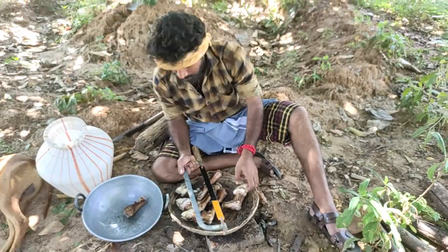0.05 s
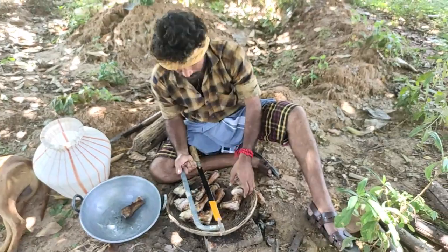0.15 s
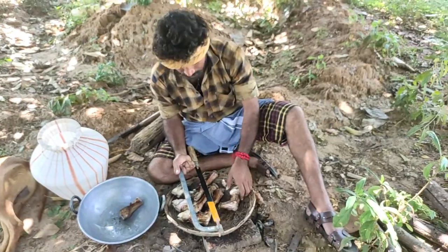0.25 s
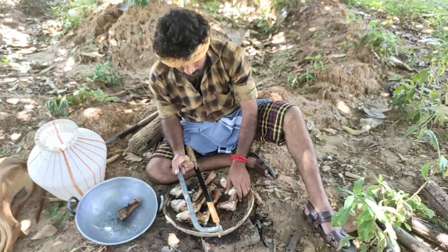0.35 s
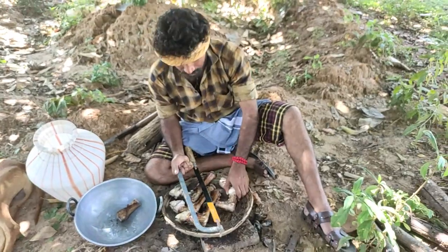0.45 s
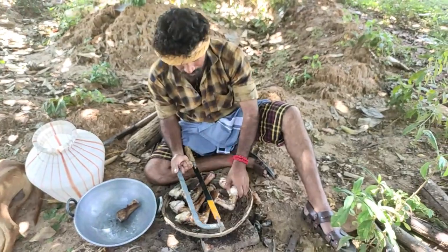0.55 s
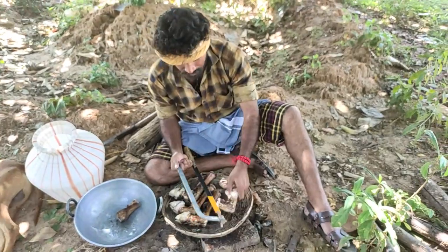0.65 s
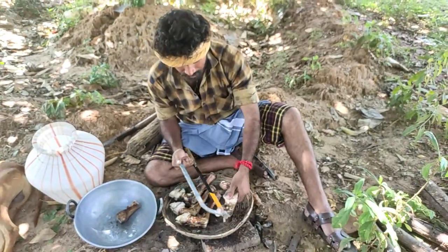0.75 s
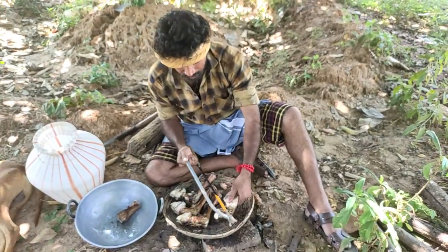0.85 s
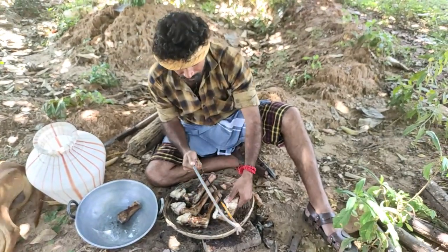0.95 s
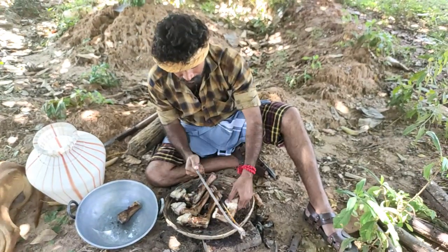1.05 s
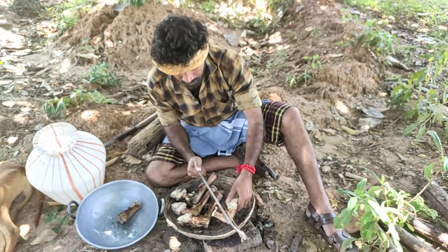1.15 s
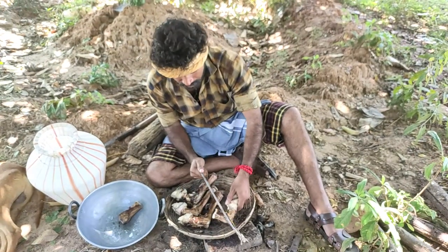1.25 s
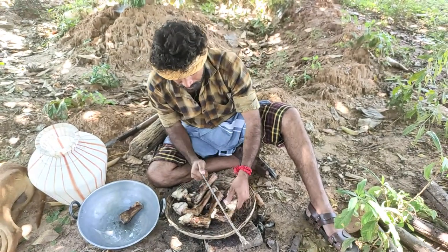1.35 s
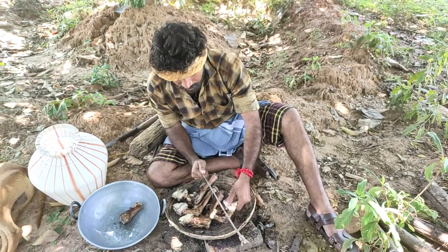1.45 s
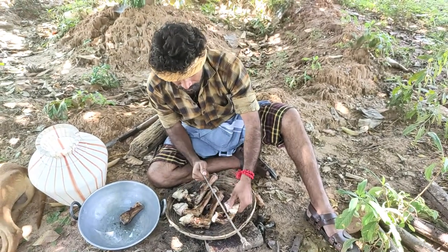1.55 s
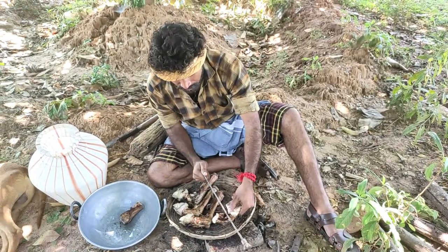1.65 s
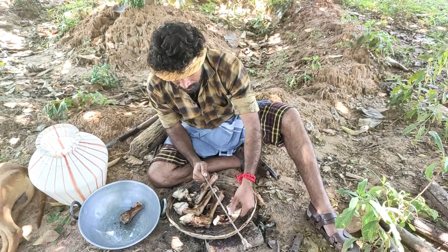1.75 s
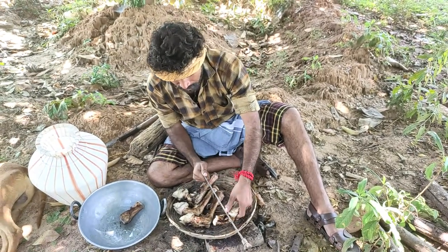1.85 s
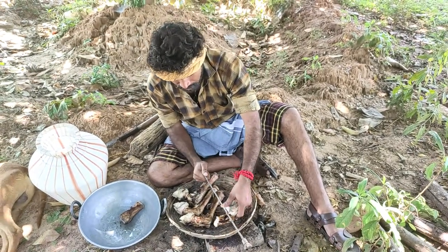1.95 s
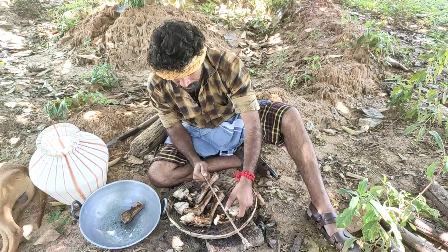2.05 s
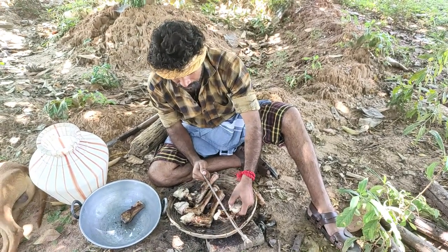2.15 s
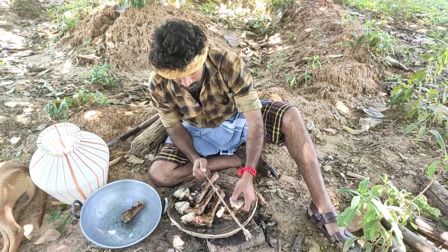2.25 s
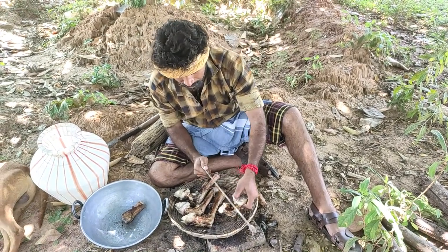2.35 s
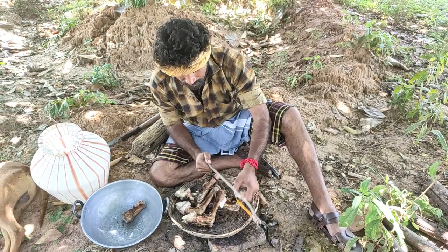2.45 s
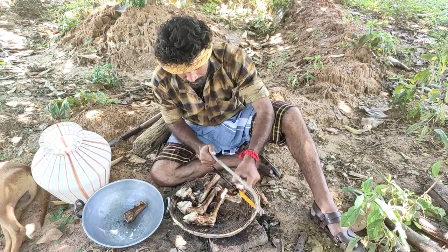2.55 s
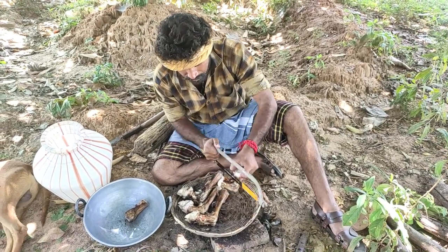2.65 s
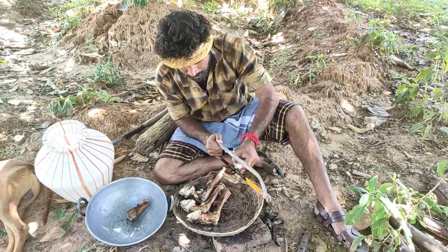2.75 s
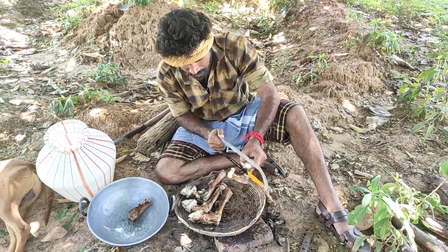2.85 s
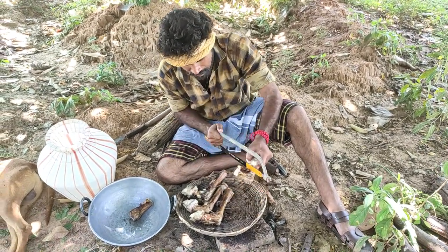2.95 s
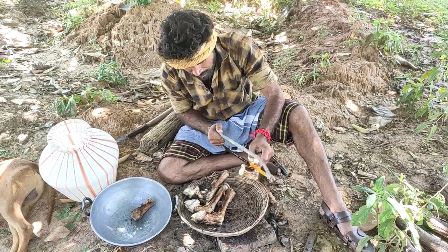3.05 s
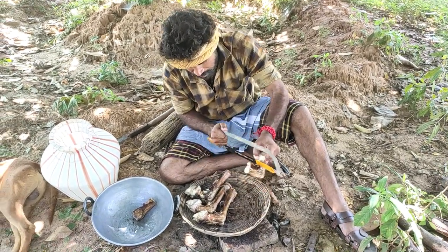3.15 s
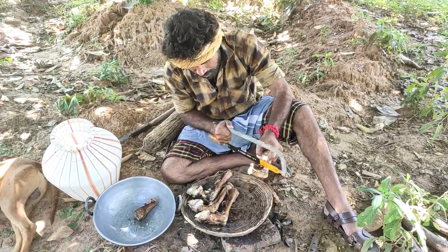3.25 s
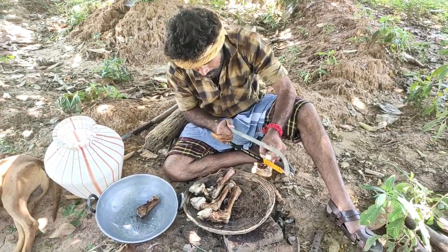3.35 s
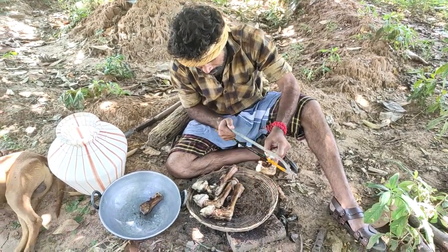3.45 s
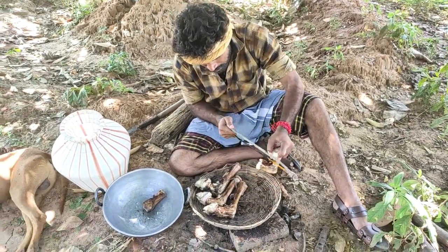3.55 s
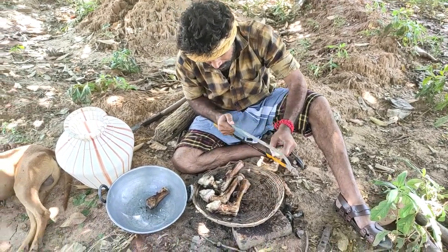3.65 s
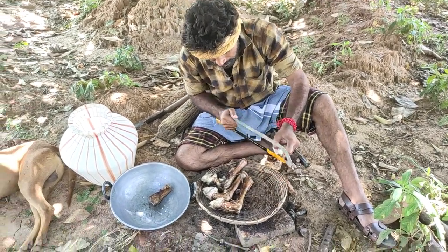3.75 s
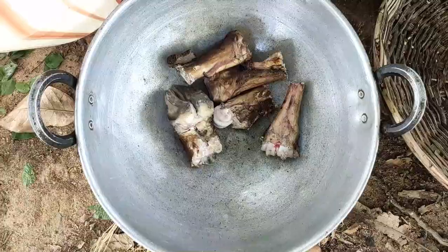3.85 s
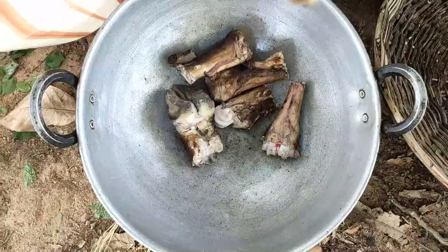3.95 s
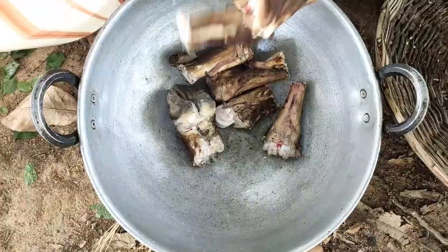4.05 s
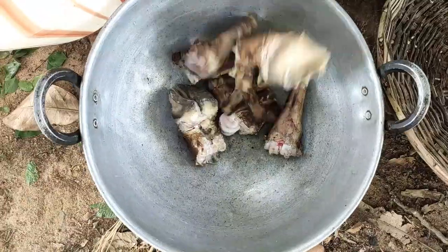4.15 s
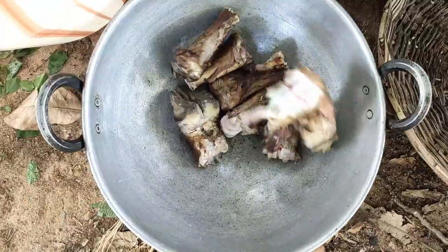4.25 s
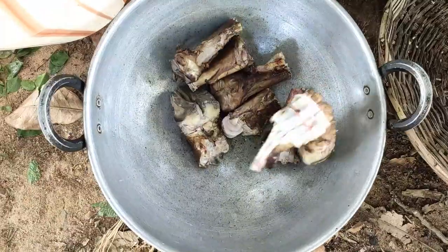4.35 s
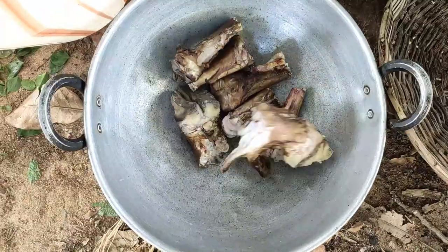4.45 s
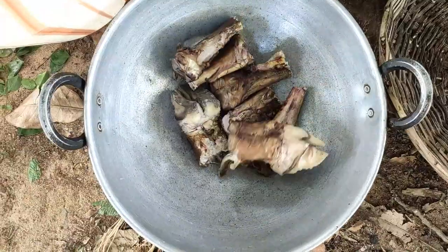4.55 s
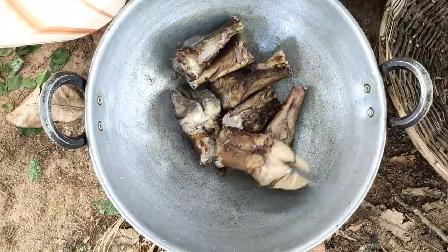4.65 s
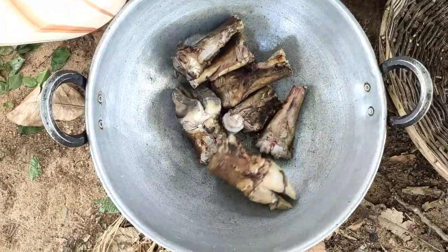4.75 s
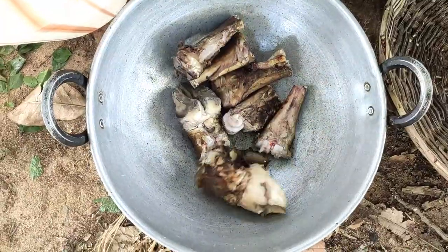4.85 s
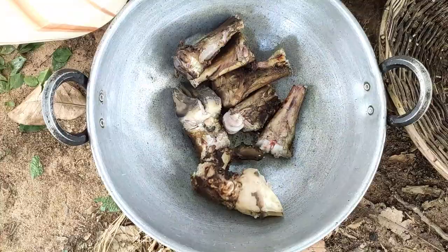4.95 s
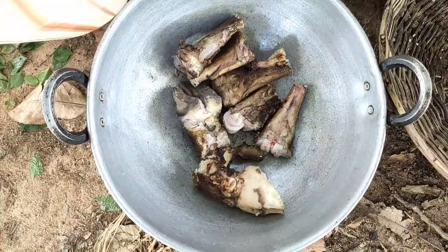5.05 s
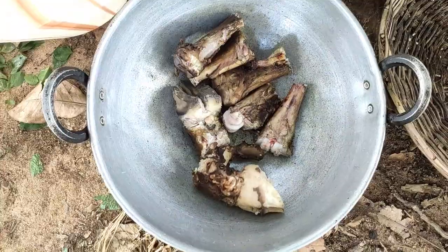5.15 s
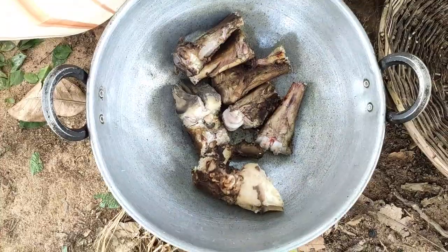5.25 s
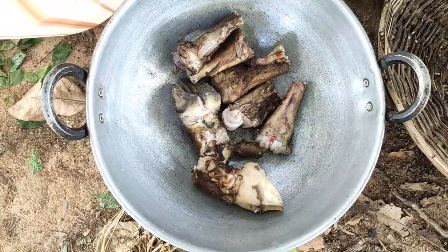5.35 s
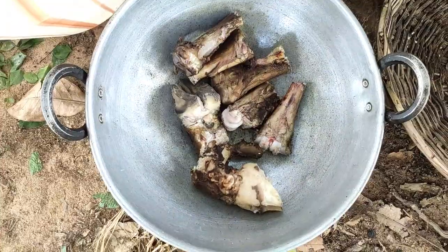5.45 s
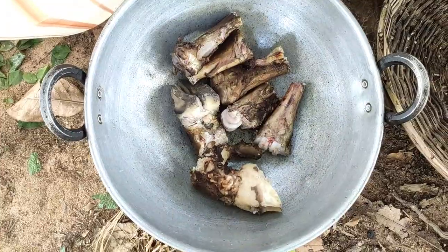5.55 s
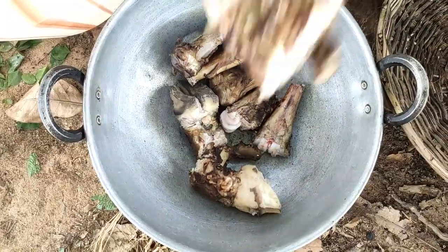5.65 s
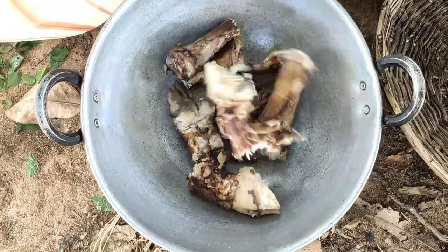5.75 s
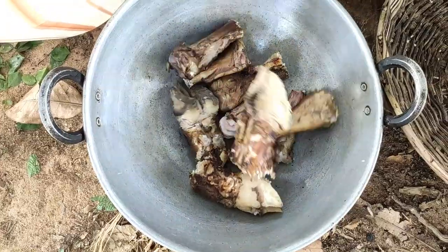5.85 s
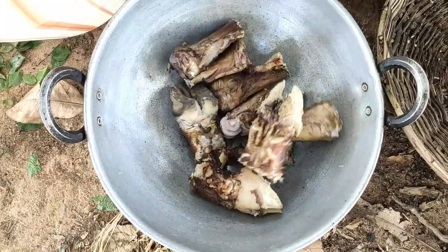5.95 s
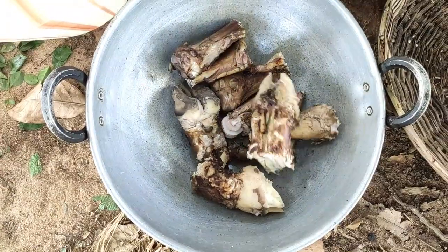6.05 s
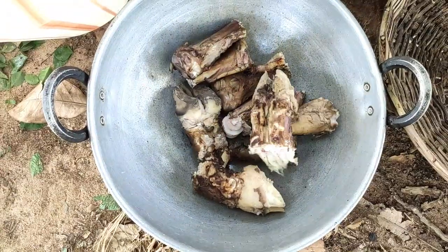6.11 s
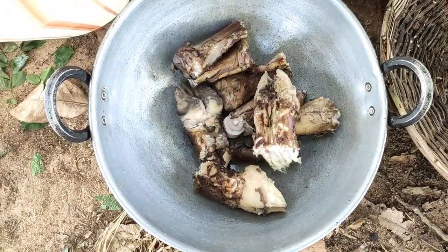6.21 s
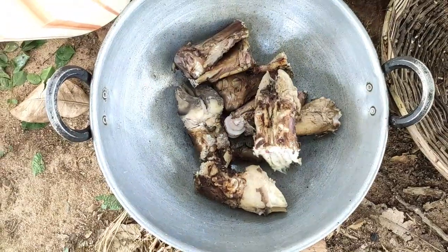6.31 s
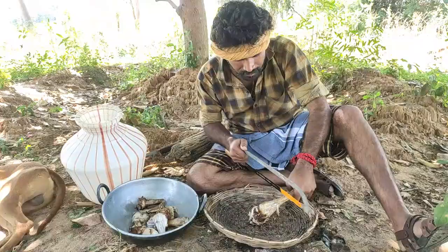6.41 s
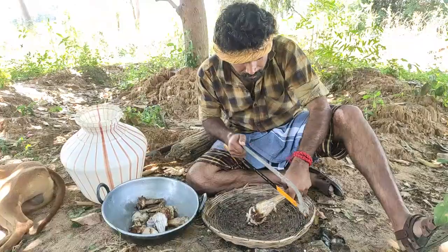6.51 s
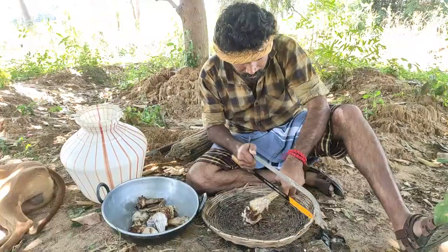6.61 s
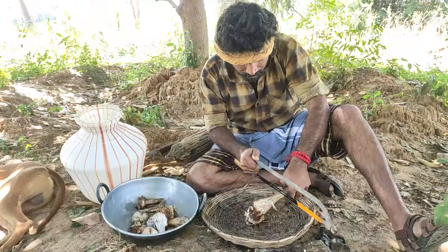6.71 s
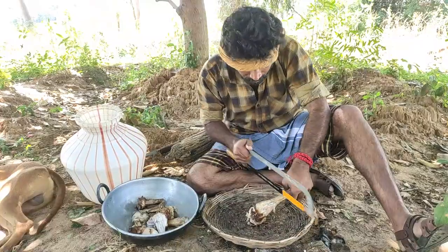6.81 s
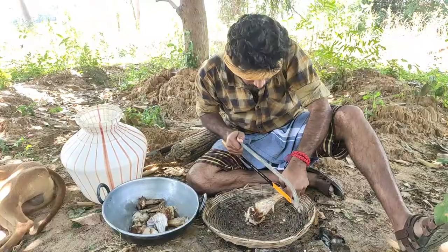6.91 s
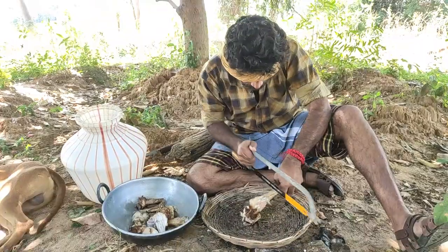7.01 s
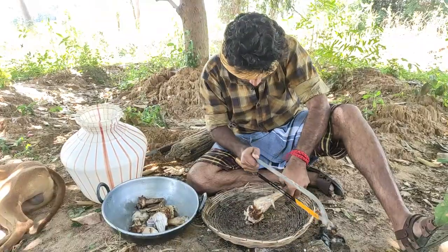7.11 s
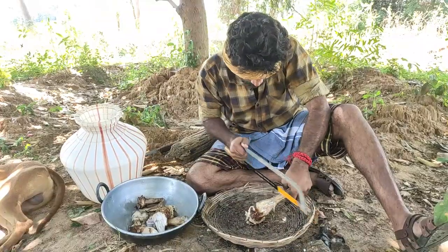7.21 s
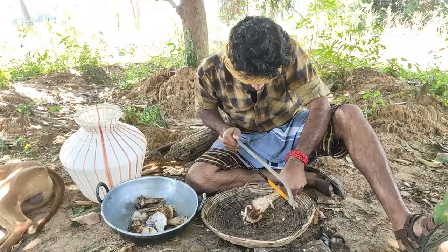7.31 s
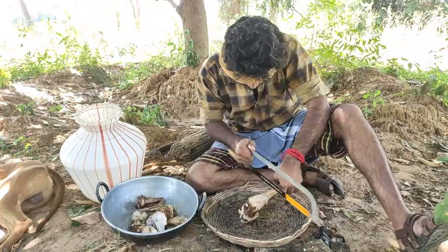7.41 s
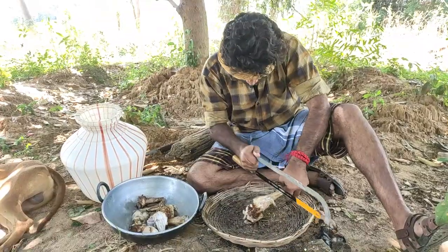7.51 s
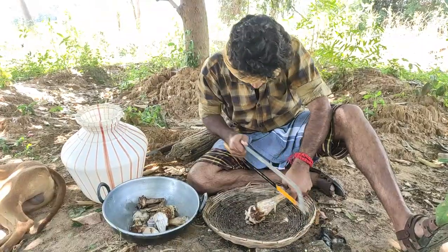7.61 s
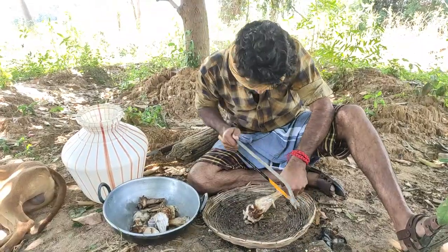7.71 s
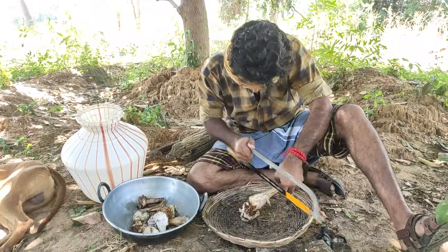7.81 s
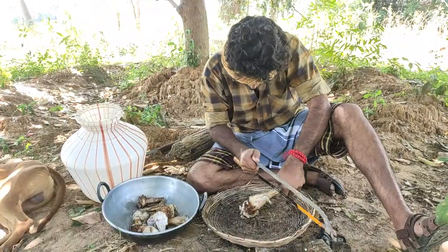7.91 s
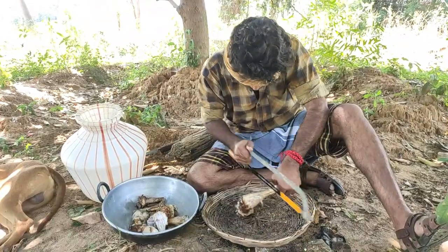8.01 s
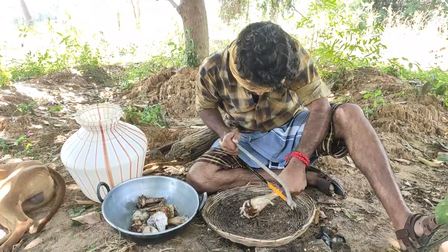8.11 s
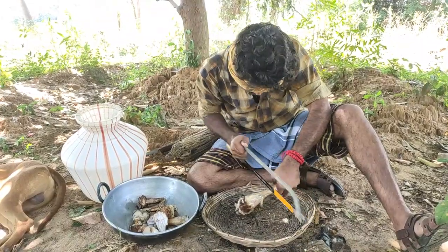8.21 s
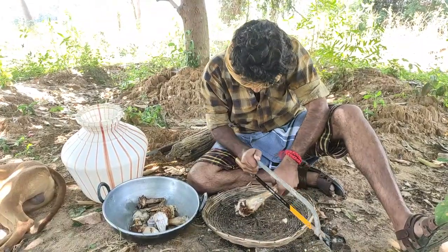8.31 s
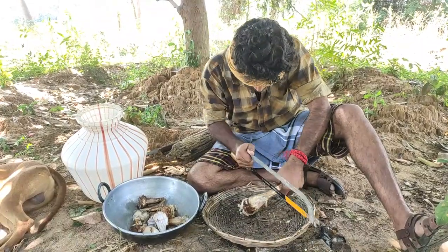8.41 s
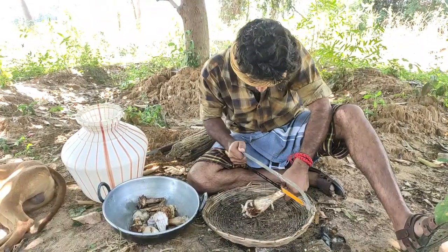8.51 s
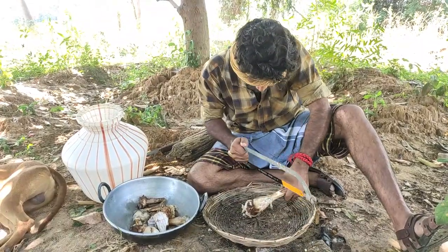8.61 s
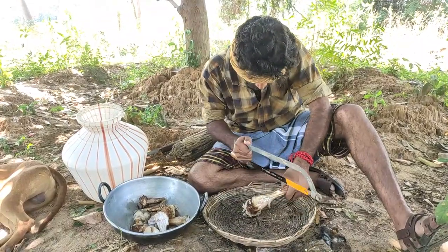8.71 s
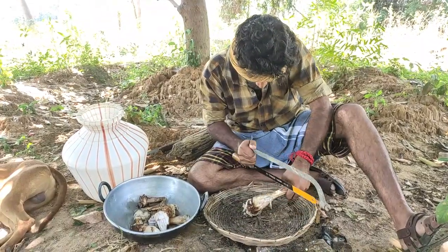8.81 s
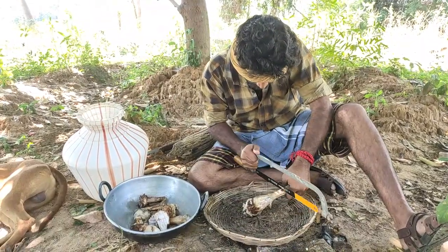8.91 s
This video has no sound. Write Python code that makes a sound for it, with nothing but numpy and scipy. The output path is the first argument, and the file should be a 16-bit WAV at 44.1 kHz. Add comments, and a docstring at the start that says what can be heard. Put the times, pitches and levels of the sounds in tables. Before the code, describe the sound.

Bone pieces drop clanking into a metal bowl outdoors, then a hand hacksaw rasps through bone in quick strokes amid wind and birds.

```python
"""Hand saw, bone and metal bowl outdoors

A hand hacksaw rasps to and fro through bone: tooth buzz and torn grit, both paced by blade speed.
Cut pieces land in an aluminium bowl: ringing modes thump, noise bursts clack, sparse grains roll.
Wind buffets two microphone ports as lumpy low noise with single pops; birds are gliding tones and noise bands.
A far roar, a wavering hum, leaf hiss and faint swells of crackling treble noise lie behind."""
import sys
import numpy as np
from scipy import signal
from scipy.fft import rfft, irfft, next_fast_len
from scipy.io import wavfile
from scipy.ndimage import uniform_filter1d, map_coordinates

SR = 44100
rng = np.random.default_rng(int(sys.argv[2]) if len(sys.argv) > 2 else 0)


def materialize(psi):
    """Save the field psi as 16-bit PCM at rate SR to the path in sys.argv[1].

    A 1-D psi becomes a single channel; in a 2-D psi each row is a channel.
    """
    bounded = np.clip(np.atleast_2d(psi).T, -1, 1)
    quanta = np.round(bounded * 32767).astype(np.int16)
    wavfile.write(sys.argv[1], SR, quanta)


N = 395577


def amp(db):
    """dB to gain."""
    return 10 ** (np.asarray(db) / 20)


def unit(x):
    """Scaled to rms 1."""
    return x / np.sqrt(np.mean(x ** 2) + 1e-20)


def along(points, hz):
    """Values of a (f/Hz, value) curve, read on a log frequency axis."""
    f, v = np.transpose(points)
    return np.interp(np.log(hz + 1), np.log(f + 1), v)


def curves(rows):
    """One value per sample for each column after the time."""
    t, *columns = np.transpose(rows)
    return [np.interp(np.arange(N) / SR, t, column) for column in columns]


def stretch(rows):
    """The samples that a table spans, and its columns on them."""
    t, *columns = np.transpose(rows)
    at = np.arange(round(t[0] * SR), min(round(t[-1] * SR), N))
    return at, [np.interp(at / SR, t, column) for column in columns]


def span(start, length):
    """The samples of an event, and the share of it gone by at each."""
    at = np.arange(round(start * SR), min(round((start + length) * SR), N))
    return at, (at / SR - start) / length


def swells(rows, roundness):
    """A gain that swells and fades once for each (start t/s, length t/s, level/dB) row."""
    gain = np.zeros(N)
    for start, length, db in rows:
        at, u = span(start, length)
        gain[at] += amp(db) * np.abs(np.sin(np.pi * u)) ** roundness
    return gain


def wobble(rate, size=N):
    """A smooth random curve, rate knots a second."""
    knots = rng.standard_normal(int(size * rate / SR) + 4)
    return map_coordinates(knots, [np.arange(size) * rate / SR])


def filtered(x, response):
    """x shaped by a complex response of frequency."""
    n = x.shape[-1]
    m = next_fast_len(n + 8192)
    return irfft(rfft(x, m) * response(np.fft.rfftfreq(m, 1 / SR)), m)[..., :n]


def rush(db_at, alike, size=N):
    """Stereo noise of rms 1; the mid-side balance at each frequency sets its left-right likeness."""
    def shape(hz):
        angle = np.arccos(np.clip(along(alike, hz), -1, 1)) / 2
        return amp(db_at(hz)) * np.array([np.cos(angle), np.sin(angle)])

    mid, side = filtered(rng.standard_normal((2, size)), shape)
    return unit(np.array([mid + side, mid - side]))


def panned(db):
    """Left and right gains for a left-right level difference."""
    return amp(np.array([db / 2, -db / 2]))


# Far roar and leaf hiss, with sudden steps in level: t/s, roar level/dB, hiss level/dB
FIELD_LEVELS = [(0, -59.5, -69.5), (3.4, -60.5, -70), (3.85, -58.5, -66), (3.86, -64, -69.5),
                (6.48, -66, -69.5), (6.49, -63.5, -65.5), (8.5, -64.5, -65.5), (8.7, -68, -70),
                (8.97, -70.5, -72)]
# Spectrum of the far roar: f/Hz, level/dB per Hz
ROAR_SPECTRUM = [(18, -30), (30, -0.5), (56, -6), (91, -14.5), (197, -12.5), (266, -22), (600, -33.5),
                 (750, -34), (980, -31), (1250, -35), (1600, -36.5), (2300, -36.5), (3300, -44),
                 (5000, -53.5), (9000, -100)]
# Spectrum of the leaf hiss: f/Hz, level/dB per Hz
HISS_SPECTRUM = [(1500, -36.5), (2500, -14), (3700, -11.5), (13000, -17), (15000, -28.5), (16200, -50.5)]
# Left-right likeness of far sound: f/Hz, likeness (1 = same in both)
FAR_LIKENESS = [(60, 0.91), (240, 1), (950, -0.13), (3770, -0.11), (15000, 0.18)]
# Glide of the far hum: t/s, f/Hz, level/dB
HUM_GLIDE = [(0, 197, -70), (.5, 196.4, -62), (1.5, 194.5, -58.5), (2.6, 194.7, -60.5), (3.2, 189.3, -71),
             (3.85, 194, -80)]
# Faint swells of crackling treble noise: start t/s, length t/s, level/dB
CRACKLE_SWELLS = [(0, 0.23, -67), (3.86, 0.12, -64), (3.96, .19, -58.5), (5.2, .2, -75.5),
                  (5.55, 0.16, -74.5)]


def field():
    """Two noise beds, roar and leaf hiss, with a wavering sine hum and faint swells of crackling treble noise."""
    roar_db, hiss_db = curves(FIELD_LEVELS)
    low_cut = lambda hz: -12 * np.log2(1 + (150 / (hz + 1)) ** 2)
    roar = rush(lambda hz: along(ROAR_SPECTRUM, hz) + low_cut(hz), FAR_LIKENESS)
    hiss = rush(lambda hz: along(HISS_SPECTRUM, hz), FAR_LIKENESS)
    out = amp(roar_db + wobble(5.2)) * roar + amp(hiss_db + wobble(2.0)) * hiss

    at, (hum_hz, hum_db) = stretch(HUM_GLIDE)
    turn = 2 * np.pi * np.cumsum(hum_hz + 8 * wobble(25, size=len(at))) / SR
    out[:, at] += amp(hum_db + 2.8 * wobble(14, size=len(at))) * np.sin(turn)

    treble = rush(lambda hz: -5 * np.log2(hz / 10000 + 1e-3) ** 2, FAR_LIKENESS)
    crackle = unit(amp(2.9 * wobble(120)) * treble)
    return out + swells(CRACKLE_SWELLS, roundness=.4) * crackle


# Buffeting on the ports: t/s, level/dB, left-right level/dB
WIND_BUFFETS = [(0, -43, 0.5), (3.1, -44, 2.8), (3.9, -36, 0.5), (4.3, -41, 7), (4.55, -37.5, -13),
                (5.2, -37, -10.5), (5.9, -30.5, -12), (6.3, -36.5, -1.5), (6.6, -48.5, -0.5),
                (7.6, -45.5, -1), (8.0, -42, -9.5), (8.4, -40, -12.5), (8.97, -41.5, -8)]
# Spectrum of the buffeting: f/Hz, level/dB per Hz
RUMBLE_SPECTRUM = [(8.8, -37.5), (15, 0.5), (33, 2.5), (107, -14.5), (247, -34), (384, -57), (458, -56),
                   (500, -67.5), (650, -92), (1100, -120)]
# Single eddies popping, mostly on the right port: t/s, peak level/dB, f/Hz
EDDY_POPS = [(4.516, -23, 81), (4.675, -21.5, 79), (4.706, -22.5, 99), (4.787, -24.5, 70),
             (4.851, -28, 107.5), (4.956, -25.5, 92), (5.045, -20.5, 122), (5.117, -23, 89.5),
             (5.148, -20.5, 76.4), (5.289, -21.5, 62), (5.713, -18.5, 109.3), (5.779, -33, 92.4),
             (7.736, -20, 53), (7.911, -25.5, 45), (8.254, -21.5, 85.6), (8.32, -23, 59.9),
             (8.659, -26.5, 87.5), (8.745, -24, 44)]


def wind():
    """Turbulence thuds on the ports in lumps, partly shared; single eddies give one or two low swings."""
    db, pan_db = curves(WIND_BUFFETS)
    lumps = amp(1.6 * wobble(3.5) + 2.2 * np.array([wobble(22), wobble(25)]))
    rumble = rush(lambda hz: along(RUMBLE_SPECTRUM, hz), [(30, 0.063), (300, 1.0)])
    out = amp(db) * panned(pan_db) * unit(lumps * rumble)

    half = SR // 20
    t = np.arange(-half, half) / SR
    for (start, pop_db, hz), phase in zip(EDDY_POPS, rng.uniform(-1.94, 1, len(EDDY_POPS))):
        swing = np.exp(-(t * hz * 2.23) ** 2) * np.cos(2 * np.pi * hz * t + phase)
        out[:, round(start * SR) - half:][:, :len(t)] += amp(pop_db) * swing * [[.12], [1]]
    return out


SWELL_DB, FADE_DB = 10, 5.5  # a call starts and ends this far under its level at the turn


def call(start, length, first_hz, turn_hz, last_hz, turn, db):
    """Samples, pitch and gain of a call that glides to a turning point, loudest there, and on to its end."""
    at, u = span(start, length)
    knots = [0, np.clip(turn, .05, .95), 1]
    hz = uniform_filter1d(np.interp(u, knots, [first_hz, turn_hz, last_hz]), size=500)
    gain = amp(db - np.interp(u, knots, [SWELL_DB, 0, FADE_DB]))
    return at, hz, gain * signal.windows.tukey(len(at), .2)


# Hoarse far calls: start t/s, length t/s, first f/Hz, turn f/Hz, last f/Hz,
# turn as a share of the length, turn level/dB, random knots a second that set the width of the band/Hz
HOARSE_CALLS = [(3.3, 0.45, 3570, 3350, 3400, 0.35, -62.5, 705),
                (3.44, 0.11, 4550, 4260, 4170, 0.47, -63, 694),
                (7.37, .11, 5000, 4890, 4800, 0.44, -43, 242), (7.56, 0.15, 4600, 4530, 4660, .4, -43, 252),
                (7.901, .12, 4936, 4710, 4600, 0.5, -39, 246),
                (8.07, 0.15, 5100, 4900, 4870, 0.52, -48, 251)]


def hoarse_calls():
    """A gliding sine times fast random curves gives a narrow band of noise that moves like a call."""
    out = np.zeros((2, N))
    for *row, width_hz in HOARSE_CALLS:
        at, hz, gain = call(*row)
        fuzz = np.array([wobble(width_hz, size=len(at)) for _ in range(2)])
        out[:, at] += gain * fuzz * np.sin(2 * np.pi * np.cumsum(hz) / SR)
    return out


# Whistled bird calls: start t/s, length t/s, first f/Hz, turn f/Hz, last f/Hz,
# turn as a share of the length, turn level/dB
BIRD_CALLS = [(0.128, 0.064, 2800, 3160, 2870, .65, -59), (0.389, 0.065, 2800, 3080, 2830, 0.57, -61),
              (.655, 0.077, 2800, 3240, 2900, .7, -58.5), (0.896, 0.11, 2700, 3170, 2860, 0.77, -58.5),
              (1.269, .09, 2550, 2500, 2420, 0.37, -67), (1.44, 0.084, 7100, 6470, 6520, 0.49, -64),
              (1.669, 0.11, 5700, 4060, 2560, .4, -62), (1.756, .11, 4720, 5840, 5240, 0.82, -63.5),
              (2.072, 0.066, 5100, 5470, 5200, 0.35, -71), (2.2, 0.14, 4800, 5300, 6940, .62, -73),
              (2.326, 0.062, 7440, 6800, 7060, 0.47, -60.5), (3.441, 0.078, 7550, 6730, 7300, 0.46, -59),
              (3.642, 0.12, 7060, 6380, 6520, 0.44, -65), (3.63, .14, 5770, 4330, 1980, .3, -66.5),
              (4.922, 0.039, 1970, 2700, 2260, 0.5, -53.5), (5.495, 0.13, 6000, 5880, 6000, 0.34, -72),
              (8.577, 0.02, 2490, 2520, 2500, .48, -57.5), (8.625, 0.016, 2500, 2530, 2520, .48, -56.5),
              (8.677, 0.017, 2570, 2530, 2530, 0.43, -57.5), (8.757, 0.035, 6200, 6090, 6050, 0.18, -52)]


def birds():
    """Whistles wavering in pitch and level, blurred by a decaying noise echo from the trees."""
    whistles = np.zeros(N)
    for row in BIRD_CALLS:
        at, hz, gain = call(*row)
        turn = 2 * np.pi * np.cumsum(hz * (1 + 0.008 * wobble(150, size=len(at)))) / SR
        whistles[at] += gain * amp(2.9 * wobble(118, size=len(at))) * np.sin(turn)

    t = np.arange(SR // 4) / SR
    echo = rng.standard_normal((2, len(t))) * amp(-60 * t / 0.32)  # 0.32 s to fall 60 dB
    echo /= np.linalg.norm(echo[0])
    blur = signal.fftconvolve(whistles[None], echo, axes=1)[:, :N]
    return whistles * panned(0.54)[:, None] + 0.46 * blur


# A piece rolling and scuffing to rest in the bowl: start t/s, length t/s, level/dB
ROLL_SWELLS = [(4.545, .25, -56.5), (4.835, .24, -61.5)]
# Spectrum of bone contact, for the roll and the clacks: f/Hz, level/dB per Hz
BONE_SPECTRUM = [(300, -15.5), (1000, -21.5), (1600, -12), (2500, -3), (5000, 1.5), (10000, 0.5),
                 (16000, -4)]
# Left-right likeness of near sound, from the roll to the saw: f/Hz, likeness (1 = same in both)
NEAR_LIKENESS = [(300, 1), (700, .9), (1400, .55), (3100, 0.37), (6800, 0.0054)]


def roll():
    """Small, sparse grains of contact over a faint scrape: noise with a fast random gain."""
    grains = amp(5 * wobble(300) + 5.1 * wobble(40))
    scrape = rush(lambda hz: along(BONE_SPECTRUM, hz), NEAR_LIKENESS)
    return swells(ROLL_SWELLS, roundness=.6) * unit(grains * scrape)


# Hard contacts of bone and blade: t/s, level/dB, brightness/dB per octave
HARD_CONTACTS = [(1.5017, -45, 4.5), (1.7994, -49.5, 2), (3.1133, -39, 1.5), (3.122, -38.5, 3),
                 (3.1498, -40, 3), (3.1898, -42, 2), (3.1952, -28.5, -0.6), (3.2085, -32.5, 3.2),
                 (3.267, -36, 3.5), (3.2918, -41.5, 0), (4.178, -27.5, -2.5), (4.188, -31, -2.5),
                 (4.238, -35.5, -4), (4.2473, -21.5, -2.5), (4.2888, -22.5, -2.5), (4.3, -29, -2),
                 (4.333, -21.5, -3), (4.345, -29.5, -5), (4.3775, -31, -2.5), (4.3895, -15, -4),
                 (4.3994, -15.5, -2.5), (4.4077, -28, -3), (4.4348, -34, -2), (4.4874, -37.5, -7),
                 (4.554, -44, -4), (4.579, -44.5, -4.5), (4.6372, -30, -8.5), (4.707, -27.5, -3),
                 (4.854, -50, 0), (4.8782, -47.5, -1), (4.9053, -44.5, -4.5), (4.9763, -45.5, -5),
                 (5.04, -54, 3), (5.3033, -53.5, -2), (5.4802, -51, 4), (5.8388, -21.5, -3.6),
                 (5.8522, -13.5, -17.5), (5.854, -10, -4.5), (5.9425, -28, -0.7), (5.9475, -17.5, -0.2),
                 (5.9573, -13, -8), (5.993, -26, -1.5), (6.0122, -32, -7.5), (6.0273, -32.5, -3.5),
                 (6.0387, -43, 4.5), (6.084, -43.5, -0.5), (8.1829, -34, -10)]
CRACK_T60, RATTLE_T60 = .016, 0.12  # s to fall 60 dB


def clacks():
    """Each hard contact is a short noise crack, then a lumpy rattle that dies away."""
    out, t = np.zeros((2, N + SR)), np.arange(SR // 4) / SR
    for start, db, tilt in HARD_CONTACTS:
        spectrum = lambda hz: along(BONE_SPECTRUM, hz) + tilt * np.log2((hz + 50) / 5000)
        noise = rush(spectrum, NEAR_LIKENESS, size=len(t))
        crack = amp(-60 * t / CRACK_T60) * (1 - np.exp(-t / .0007))
        lumps_db = 2.5 * wobble(300, size=len(t))
        rattle = 0.27 * amp(-60 * t / RATTLE_T60 + lumps_db) * (1 - np.exp(-t / 0.0034))
        out[:, round(start * SR):][:, :len(t)] += amp(db) * (crack + rattle) * noise * panned(1.2)[:, None]
    return out[:, :N]


# Pieces landing in the bowl, and one last knock beside the saw:
# t/s, level/dB, main mode f/Hz, hardness/dB per octave, damping (1 = free ring)
LANDINGS = [ (4.177, -5.5, 598, -24, 0.74), (4.1816, -6.5, 600, -15.5, 1.8), (4.246, -16.5, 538, -12, 1.15),
            (4.2494, -3, 707, -13, 2.6), (4.29, -13.5, 526, -13, 1.34), (4.338, -9.5, 620, -7, 2.5),
            (4.344, -24, 603, 6, 1.2), (4.347, -4.5, 568, -11, 2.54), (4.369, -28.5, 583, -19, 0.39),
            (4.429, -35.5, 604, -8, 1), (4.581, -41.5, 480, -12, 1.9), (4.643, -38, 436, -21, 4.1),
            (4.707, -27.5, 484, 19, 3.1), (4.899, -30.5, 418, -8, 2.2), (5.84, -16, 800, 0.5, 1.8),
            (5.8508, 6.5, 606.5, 4.5, 1.9), (5.8574, 3.5, 618, 5, 1.48), (5.897, -16, 584, -12.5, 2),
            (5.918, -26, 536, -6.5, 2.8), (5.926, -30.5, 440, 3.5, 0.53), (5.95, 0, 537, -15.5, 2.5),
            (5.979, -13.5, 620, -3, 1.9), (5.99, -17.5, 610, -20, 0.62), (6.012, -16, 534, -4, 1.7),
            (6.034, -30, 590, -2, 0.53), (6.082, -15.5, 562, -20, 1.76), (6.134, -25.5, 500, -20.5, 1.5),
            (6.221, -31.5, 448, -23, 1), (8.184, -29, 1044, 9, 1.1), ]
# Modes of the bowl when its main mode is at 608 Hz: f/Hz, level/dB, 60 dB decay t/s
BOWL_MODES = [(229, -4.5, 0.022), (363, -6, 0.03), (589, 5.5, 0.02), (957, -13.5, 0.044),
              (1159, -17, 0.036), (1324, -13, 0.025), (1580, -19, 0.02), (2170, -24.5, 0.0099),
              (2404, -20, 0.027), (2636, -24, 0.017), (3710, -30, .015), (4630, -30, 0.019)]
MAIN_HZ = 608  # tuning of the mode table
PUSH_DB, PUSH_S = -15, 0.0027  # the whole bowl is shoved once by each landing


def thumps():
    """Each landing rings the bowl, retuned and damped by its load; a harder contact reaches higher modes."""
    out, t = np.zeros((2, N + SR)), np.arange(SR // 5) / SR
    hz, level, t60 = np.transpose(BOWL_MODES)[:, :, None]
    octaves_up = np.maximum(np.log2(hz / MAIN_HZ), 0)
    push = -amp(PUSH_DB) * np.e * t / PUSH_S * np.exp(-t / PUSH_S)
    for start, db, main_hz, hard, damping in LANDINGS:
        level_luck, phase_luck = rng.normal(0, 1, (2, len(BOWL_MODES), 1))
        size = amp(level + 1.5 * level_luck + hard * octaves_up - 60 * t * damping / t60)
        turn = 2 * np.pi * hz * main_hz / MAIN_HZ * t
        lead = .15 + 0.36 * phase_luck * hz / 1100  # each mode reaches the two ports at its own phase
        ring = np.array([(-size * np.sin(turn + side * lead)).sum(0) for side in (1, -1)])
        ring *= 1 - np.exp(-t * damping / 0.0049)
        ring = ring / np.abs(ring).max() * panned(-3.1)[:, None]
        noise = rush(lambda f: -6 * np.log2(f / 600 + .001) ** 2, NEAR_LIKENESS, size=len(t))
        tail = 0.035 * amp(-60 * t / 0.1) * noise
        out[:, round(start * SR):][:, :len(t)] += amp(db) * (ring + tail + push)
    return filtered(out[:, :N], lambda f: (1j * f / (120 + 1j * f)) ** 2)  # a small bowl radiates no bass


# Saw strokes: start t/s, length t/s, full-speed rasp level/dB, lean from start to end/dB,
# top tooth rate f/Hz, buzz level/dB, share of the stroke that is silent before its sound sets in
SAW_STROKES = [(2.69, .19, -53, 6, 599.7, -75, .02), (2.911, .17, -52, -1.5, 600, -79, .02),
               (6.437, .19, -42, 5, 600, -69, .23), (6.646, .175, -30.5, 4.5, 862.7, -52.5, 0.02016),
               (6.856, .19, -33, -7, 740, -50.5, .02), (7.054, .185, -28.5, -2, 903.8, -48, .02),
               (7.253, .2, -32.5, -13.5, 888.7, -50, .06), (7.452, .18, -30.5, 2.5, 1016, -56.5, 0.016),
               (7.644, .185, -32, -11, 1018, -49, .19), (7.834, .22, -29.5, 3.5, 1002, -56.5, 0.055),
               (8.1, 0.072, -53, 4, 596, -75, .02), (8.148, .13, -35, -17.5, 700, -64, .25),
               (8.282, .195, -32.5, -1, 991, -59.5, 0.035), (8.48, .15, -42.5, -17.5, 604, -67, 0.21)]
ONSET_S = .006  # the sound of a stroke sets in this fast
BUZZ_LEAN_DB = -10  # the buzz is stronger early in a stroke
RASP_LAW, BUZZ_LAW, RATE_LAW = 1.42, 1.5, .85  # powers of blade speed
# between strokes the blade still drags in the cut
DRAG_START_S, DRAG_LENGTH_S, DRAG_DB, DRAG_LEAN_DB = 6.484, 2, -58, -6


def stroke_controls():
    """Blade speed is half a sine over each stroke; rasp, buzz and tooth rate follow it."""
    level, buzz, rate = np.zeros(N), np.zeros(N), np.zeros(N)
    for start, length, db, lean_db, top_hz, buzz_db, silent in SAW_STROKES:
        at, u = span(start, length)
        speed = np.abs(np.sin(np.pi * u))
        onset = np.clip((u - silent) * length / ONSET_S, 0, 1)
        level[at] += onset * amp(db + lean_db * (u - .5)) * speed ** RASP_LAW
        buzz[at] = onset * amp(buzz_db + BUZZ_LEAN_DB * (u - .5)) * speed ** BUZZ_LAW
        rate[at] = top_hz * speed ** RATE_LAW
    at, u = span(DRAG_START_S, DRAG_LENGTH_S)
    level[at] = np.hypot(level[at], amp(DRAG_DB + DRAG_LEAN_DB * (u - .5)))
    return level, buzz, rate


def patchy(x, depth_db):
    """Random gain patches, narrow in frequency and some 60 ms long."""
    z = signal.stft(x, nperseg=1024, noverlap=768)[2]
    patches = uniform_filter1d(rng.standard_normal(z.shape[1:]), size=3, axis=0)
    patches = uniform_filter1d(patches, size=10, axis=1)
    return signal.istft(z * amp(depth_db * unit(patches)), nperseg=1024, noverlap=768)[1][:, :N]


# Resonances of the blade: f/Hz, width f/Hz, level/dB
BLADE_MODES = [(694, 70, -2), (855, 45, -6.5), (1016, 60, -2), (1330, 150, 0.4), (1685, 110, 1.2),
               (2270, 175, -2)]
# Spectrum of the torn grit before the blade colours it: f/Hz, level/dB per Hz
RASP_SPECTRUM = [(250, -17), (450, -19), (900, -15.5), (1160, -21.5), (1650, -16), (2840, -10.5),
                 (3690, -4.5), (5110, -4), (6640, -0.5), (10700, 0), (13000, -6.5), (16000, -9)]
# Stereo lean of the grit: f/Hz, left-right level/dB
GRIT_SIDE = [(300, 0.5), (4400, -0.5), (8000, 5.5), (15000, 1)]


def blade(f):
    """Response of the blade: resonances in parallel over a direct path."""
    return sum(amp(db) * 1j * f * w / (c * c - f * f + 1j * f * w) for c, w, db in BLADE_MODES) + 0.54


def saw():
    """Teeth strike the bone at a rate that follows blade speed; each tooth tears off a burst of grit."""
    level, buzz, rate = stroke_controls()
    turn = 2 * np.pi * np.cumsum(rate * (1 + .03 * wobble(90))) / SR
    waver = amp(4 * wobble(90))  # the buzz level wavers at random
    teeth = buzz * waver * (np.sin(turn) + .28 * np.sin(2 * turn) + .1 * np.sin(3 * turn))

    bursts = (1 + .4 * np.cos(turn)) * amp(1.1 * wobble(40) + 2.4 * wobble(700))
    noise = rush(lambda hz: along(RASP_SPECTRUM, hz) + 20 * np.log10(abs(blade(hz))), NEAR_LIKENESS)
    # the grit is patchy: random narrow bands swell and fade
    grit = unit(bursts * patchy(noise, depth_db=4.5))
    return filtered(teeth, blade) + filtered(level * grit, lambda hz: panned(along(GRIT_SIDE, hz)))


def scene():
    """All sources at the two ports, from the background to the saw."""
    return field() + wind() + hoarse_calls() + birds() + roll() + clacks() + thumps() + saw()


def record(dry):
    """Peaks near full scale clip with a rounded knee; nothing is kept from 16 kHz up."""
    clipped = dry / (1 + np.abs(dry) ** 12) ** (1 / 12)
    return filtered(clipped, lambda hz: hz < 16000)


dry = scene()
out = record(dry)
materialize(out)
```